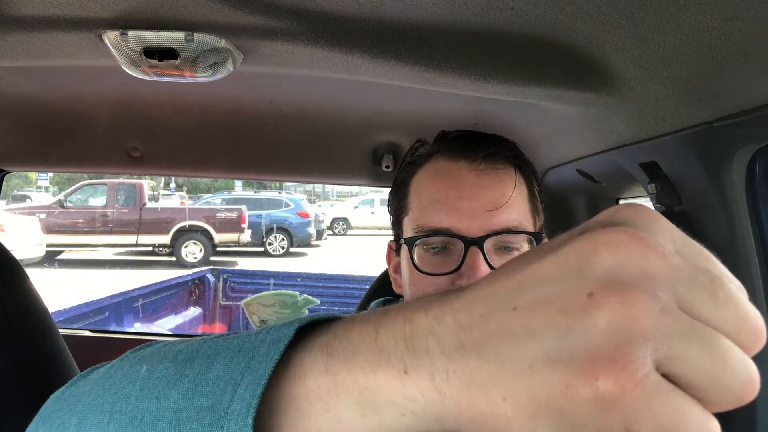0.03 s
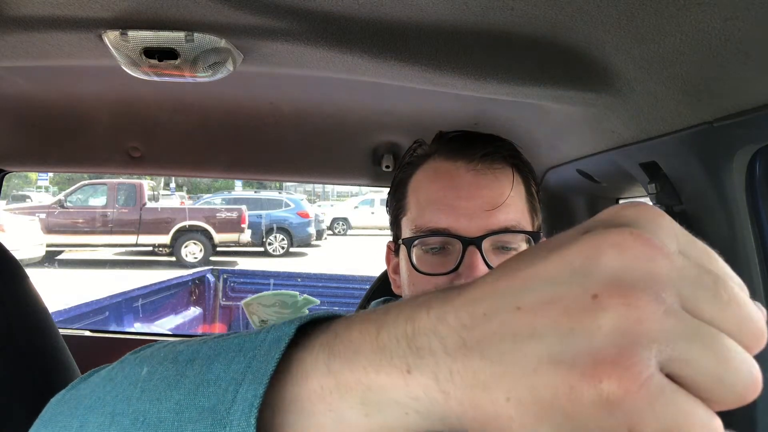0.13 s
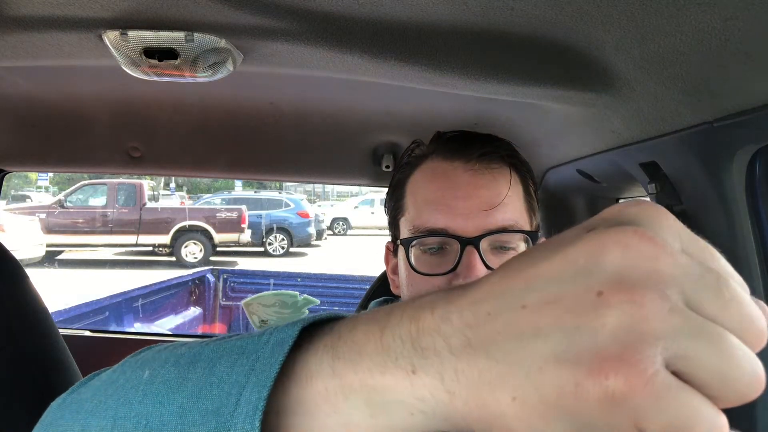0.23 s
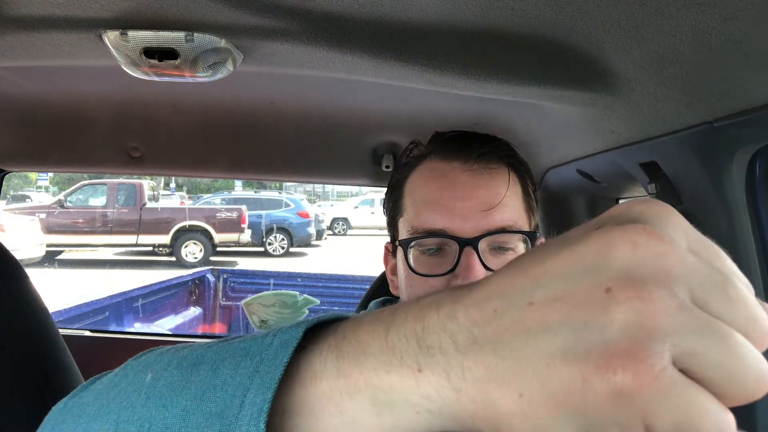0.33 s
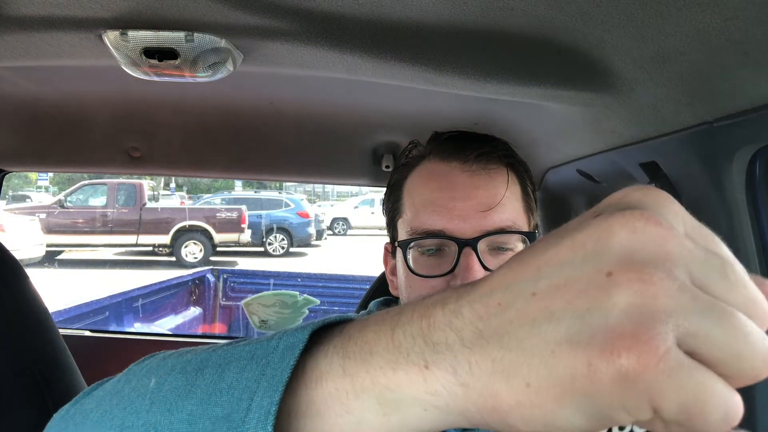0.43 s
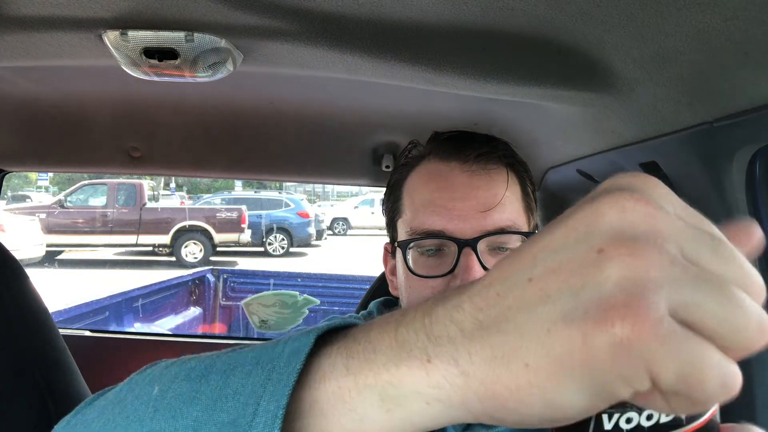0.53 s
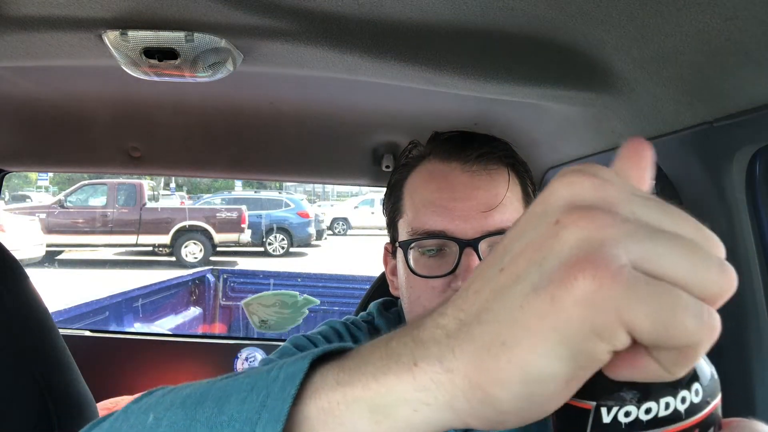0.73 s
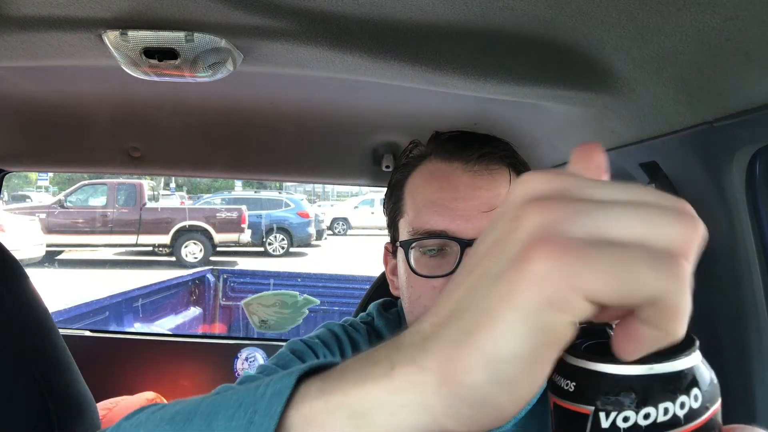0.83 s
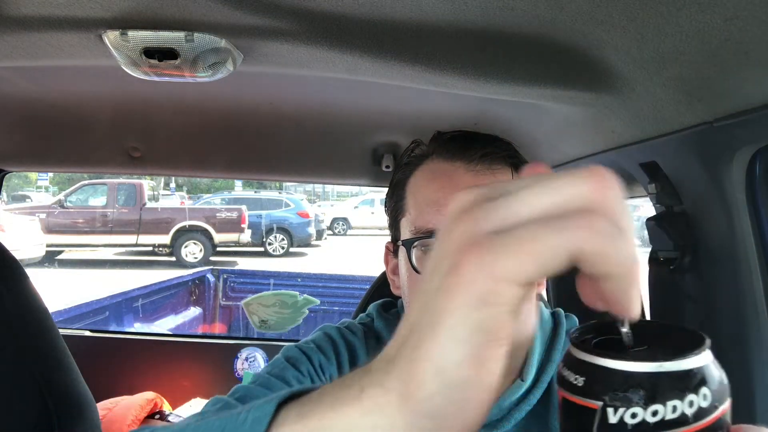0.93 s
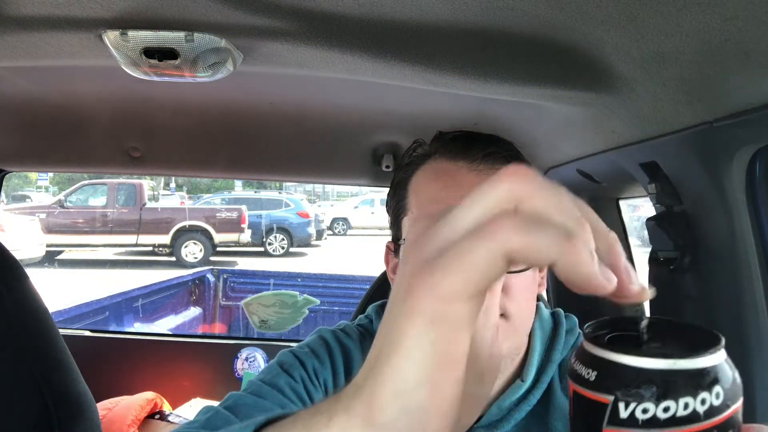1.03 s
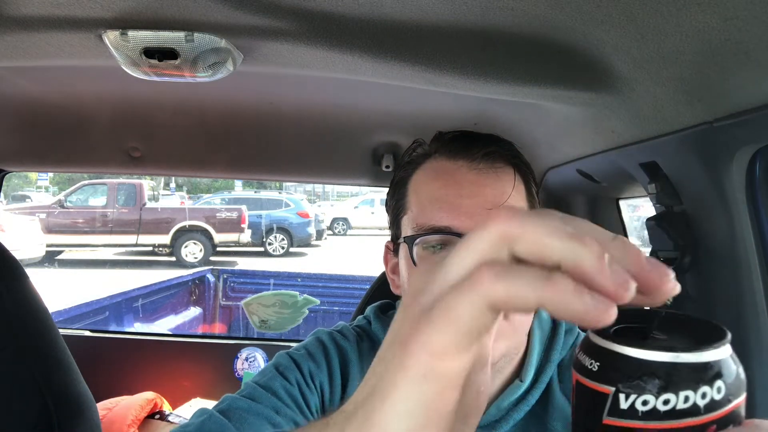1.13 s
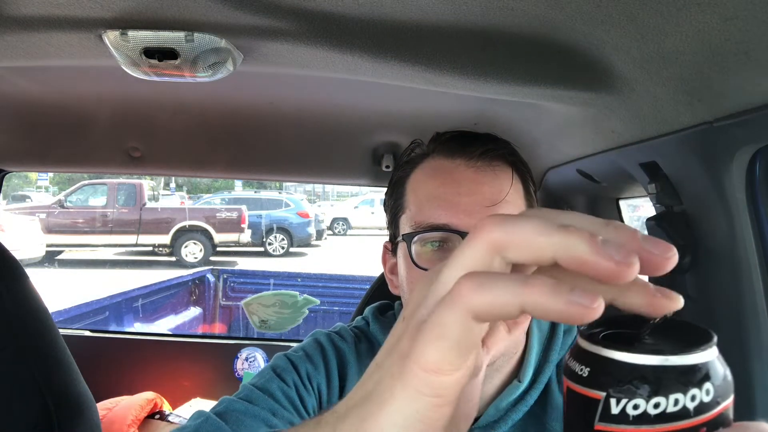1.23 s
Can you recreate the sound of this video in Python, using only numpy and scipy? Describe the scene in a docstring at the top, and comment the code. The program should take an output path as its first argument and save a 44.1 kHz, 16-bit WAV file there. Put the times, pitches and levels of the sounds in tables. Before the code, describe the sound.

An aluminium can snaps open with sharp metallic cracks, followed by faint tab ticks.

```python
"""An aluminium drink can is opened close up in a parked car, over a soft cabin rumble.
A finger brushes the tab; the tab creaks against the lid and cracks the seal.
The scored lid tears in a run of snaps and pops open; its flap scrapes inward and comes to rest.
Last, the finger pushes the tab back with faint rubs and ticks that ring the air in the can."""
import sys
import numpy as np
from scipy.fft import rfft, irfft
from scipy.io import wavfile
from scipy.ndimage import uniform_filter1d, map_coordinates

SR = 44100
rng = np.random.default_rng(int(sys.argv[2]) if len(sys.argv) > 2 else 0)


def store_pcm(level_fs):
    """Save levels as 16-bit WAV."""
    pcm = np.round(np.clip(level_fs, -1, 1) * 32767).astype(np.int16)
    wavfile.write(sys.argv[1], SR, np.atleast_2d(pcm).T)


N = 57330

# Tone colour of the tearing lid. Each row: frequency in Hz, relative level in dB.
TORN_COLOUR = [(150, -44.5), (300, -19), (550, -14.5), (1000, -6.5), (1550, -23.5), (1850, -6), (2250, -3),
               (2600, -5), (3300, 3), (4400, -1), (5200, -1.5), (6100, 7), (7000, -3), (8600, -3.5),
               (10000, -6.5), (13000, -8), (16000, -17)]


def amp(db):
    """Decibels to gain."""
    return 10 ** (np.asarray(db) / 20)


def unit(x):
    """Scale to rms 1."""
    return x / np.sqrt(np.mean(x ** 2) + 1e-20)


def fader(points):
    """Gain per sample through (s, dB) points, silent outside them."""
    return amp(np.interp(np.arange(N) / SR, *np.transpose(points), left=-np.inf, right=-np.inf))


def eq_curve(points, treble_db=0, shelf_hz=9575):
    """Unit-power gain curve through (Hz, dB) points, with a treble shelf."""
    hz = np.fft.rfftfreq(2 * N, 1 / SR) + 1
    point_hz, point_db = np.transpose(points)
    shelf_db = treble_db / (1 + (shelf_hz / hz) ** 10)
    return unit(amp(np.interp(np.log(hz), np.log(point_hz), point_db) + shelf_db))


def equalise(x, gain):
    """Minimum-phase filter with the given gain per frequency."""
    cepstrum = irfft(np.log(gain + 1e-9))
    cepstrum[1:N] *= 2
    cepstrum[N + 1:] = 0
    return irfft(rfft(x, 2 * N) * np.exp(rfft(cepstrum)))[:N]


def resonate(x, peaks):
    """Play x through (Hz, width Hz, dB) resonances."""
    hz = np.fft.rfftfreq(2 * N, 1 / SR)
    response = sum(amp(db) * 1j * hz * width / (centre ** 2 - hz ** 2 + 1j * hz * width)
                   for centre, width, db in peaks)
    return irfft(rfft(x, 2 * N) * response)[:N]


def ring(start, modes, attack):
    """Damped (Hz, dB, t60 s) modes set ringing at one moment."""
    t = np.arange(SR // 5) / SR
    tone = sum(amp(db - 60 * t / t60) * np.sin(2 * np.pi * (hz * t + rng.random()))
               for hz, db, t60 in modes)
    return np.pad((1 - np.exp(-t / attack)) * tone, (round(start * SR), N))[:N]


def snap(start, colour, treble_db, attack, crack_t60, tail_t60, tail_db):
    """A crack in thin metal: crowded modes that die fast, and a weaker tail from can and cabin."""
    t = np.maximum(np.arange(N) / SR - start, 0)
    decay = np.hypot(amp(-60 * t / crack_t60), amp(tail_db - 60 * t / tail_t60))
    burst = (1 - np.exp(-t / attack)) * decay * rng.choice([-1, 1], N)
    # Dividing out the burst's own broad colour excites the modes evenly.
    burst_colour = np.sqrt(uniform_filter1d(np.abs(rfft(burst, 2 * N)) ** 2, size=1600))
    return equalise(burst, eq_curve(colour, treble_db) / unit(burst_colour))


def cabin():
    """A bed of low rumble from outside the car, with faint hiss."""
    # Cabin tone. Each row: frequency in Hz, relative level in dB.
    rumble_colour = [(22, -37.5), (35, -10.5), (52, 2), (80, -3.5), (150, -0.5), (230, -9.5), (310, -7.5),
                     (500, -16.5), (800, -24), (1250, -25), (2000, -32.5), (4000, -35), (8000, -38),
                     (15500, -44.5)]
    return amp(-58) * unit(equalise(rng.standard_normal(N), eq_curve(rumble_colour)))


def finger(grain_db=4, grains_per_s=330):
    """Skin sticks and slides over the tab in short, faint strokes."""
    # Strokes. Each row: centre in seconds, width in seconds, level in dB, high cut in Hz.
    strokes = [(.008, 0.011, -61.5, 12300), (.55, 0.017, -65.5, 11800), (0.642, 0.014, -62.5, 3710),
               (.72, 0.045, -77.5, 3800), (.93, 0.059, -73.5, 6006)]
    # Skin on metal. Each row: frequency in Hz, relative level in dB.
    skin_colour = [(300, -12), (1200, -0.5), (1550, -3), (2300, -2.5), (2900, -8.5), (3600, -5),
                   (5000, -6.5), (7000, -6.5), (15000, -14)]
    t, hz = np.arange(N) / SR, np.fft.rfftfreq(2 * N, 1 / SR)
    grain = map_coordinates(rng.standard_normal(N), [t * grains_per_s])
    friction = unit(amp(grain_db * grain) * rng.standard_normal(N))
    rubs = np.zeros(N)
    for centre, width, db, cut_hz in strokes:
        swell = amp(db) * np.exp(-.5 * ((t - centre) / width) ** 2)
        rubs += swell * equalise(friction, unit(eq_curve(skin_colour) / (1 + (hz / cut_hz) ** 6)))
    return rubs


def tab():
    """The tab folds back; each tick rings the tab and the air under the opening."""
    # Light ticks. Each row: start in seconds, level in dB, treble in dB, attack in seconds,
    # then the air ring's pitch in Hz, level in dB and t60 in seconds.
    tick_cues = [(.5195, -60, 1, 0.00087, 793, -55.5, 0.085), (.545, -58, -2, 0.0025, 780, -58.5, .08),
                 (0.6586, -41, 1, 0.00015, 930, -44.5, 0.13), (.668, -46, 5, 0.00056, 910, -61, 0.047),
                 (.857, -64.5, 23, 0.00096, 1230, -81, .05), (1.048, -50.5, 5, 0.00047, 1150, -49, 0.04),
                 (1.0639, -46.5, 11, 0.00078, 1210, -39, 0.048),
                 (1.0693, -45, -4.5, 0.00066, 1145, -38.5, 0.06)]
    # Colour of a tick. Each row: frequency in Hz, relative level in dB.
    tick_colour = [(200, -15), (700, -27.5), (1200, -7), (1550, -9), (1900, 0.5), (2350, -3.5), (2800, -5),
                   (3400, 9), (4300, -5), (5000, -6.5), (6200, -7), (7600, -12), (9700, -14),
                   (12000, -21.5), (16000, -19)]
    # The tab's modes. Each row: frequency in Hz, relative level in dB, t60 in seconds.
    tab_modes = [(1820, -14, .06), (2300, -15, .05), (2800, -15, .045), (3335, -11, .045), (3800, -14, .04),
                 (4265, -15, .045), (6050, -15, .035), (9650, -23, .03)]
    # Faint hollow tone of the air under the opening. Each row: time in seconds, level in dB.
    air_fade = [(.74, -95.5), (.835, -66.5), (.87, -77.5), (.95, -73.5), (1.04, -85), (1.25, -91)]
    ticks = np.zeros(N)
    for start, db, treble_db, attack, air_hz, air_db, air_t60 in tick_cues:
        click = snap(start, tick_colour, treble_db, attack, crack_t60=.02, tail_t60=.069, tail_db=-9)
        ticks += amp(db) * (click + ring(start, tab_modes, attack))
        ticks += ring(start, [(air_hz, air_db, air_t60)], attack=.0014)
    hollow_air = unit(resonate(rng.standard_normal(N), [(1217, 68, 0)]))
    return ticks + fader(air_fade) * hollow_air


def flap(slips_per_s=1300, grit=.78, hiss_db=-7):
    """Tiny slips ring the flap, first as it bends, then as its edge rasps on the rim."""
    # The bend along the score and the rasp on the rim. Each row: time in seconds, level in dB.
    bend_fade = [(.364, -60.5), (.371, -25.5), (.379, -34), (.386, -25), (.391, -25), (.396, -38),
                 (.407, -44), (.422, -51), (.44, -51), (.465, -76)]
    rasp_fade = [(.392, -58.5), (.401, -37.5), (.408, -42.5), (.414, -38.5), (.422, -48.5), (.43, -46),
                 (.436, -52), (.462, -63)]
    # Resonances of flap and edge. Each row: centre in Hz, width in Hz, relative level in dB.
    flap_peaks = [(2352, 321.6, -7), (3210, 330, -1), (3918, 109, 10.5), (4400, 250, -0.5),
                  (5950, 500, -10.5), (7400, 550, -6), (8536, 240, 0.5), (12900, 310, -6.5)]
    edge_peaks = [(2178, 160, 0), (2380, 200, 0)]
    slips = unit((rng.random(N) < slips_per_s / SR) * rng.standard_normal(N))
    friction = unit(grit * slips + .5 * rng.standard_normal(N))
    hiss = amp(hiss_db) * unit(equalise(friction, eq_curve(TORN_COLOUR)))
    bend = unit(resonate(friction, flap_peaks)) + hiss
    rasp = unit(resonate(friction, edge_peaks))
    return fader(bend_fade) * bend + fader(rasp_fade) * rasp


def prying(vent_s=.31, attack=.00015, lid_t60=.05):
    """The tab levers against the lid, which snaps and rings, duller once the pressure is gone."""
    # Snaps under the tab. Each row: start in seconds, level in dB, treble in dB.
    snap_cues = [(0.223, -50.5, 3), (0.2292, -44.5, -9.5), (0.2342, -42, -12.5), (0.2422, -19.5, -2.5),
                 (0.2461, -6, 3), (.2471, -8, -0.5), (0.2792, -42, -0.5), (.2925, -45.5, -8),
                 (0.3271, -39, 6.5), (.331, -42.5, 8.5), (.3450, -25.5, -4), (0.35, -28, -11),
                 (0.3581, -16.5, 3.5), (0.3595, -15, 7.5), (0.3646, -13, 1)]
    # The lid's colour before and after it vents, and the modes it rings with at every snap. Each row: frequency
    # in Hz, relative level in dB.
    sealed_colour = [(150, -45.5), (420, -16.5), (750, -28), (1000, -17.5), (1620, -17.5), (1760, 2),
                     (2050, 0.5), (2600, -6), (3700, -8), (4800, -5.5), (5400, 4.5), (6300, -2), (7000, -7),
                     (8200, -11.5), (10400, -7), (12000, -12.5), (13300, -6.5), (15000, -17),
                     (16500, -21.5)]
    vented_colour = [(100, -35.5), (650, -14), (1000, -21.5), (1600, -27), (1780, -8), (2050, 4.5),
                     (2600, -10), (3800, -10), (4500, -5.5), (5500, 3.5), (6400, -3.5), (7700, -8.5),
                     (8700, -7.5), (9500, -24), (11000, -21.5), (14000, -19.5), (16000, -24)]
    lid_modes = [(1762, -22), (1987, -17), (2140, -23), (2295, -22), (5190, -19), (5617, -19), (6060, -20),
                 (6830, -25)]
    modes = [(hz, db, lid_t60) for hz, db in lid_modes]
    snaps = np.zeros(N)
    for start, db, treble_db in snap_cues:
        colour = sealed_colour if start < vent_s else vented_colour
        crack = snap(start, colour, treble_db, attack, crack_t60=.011, tail_t60=.056, tail_db=-14.5)
        snaps += amp(db) * (crack + ring(start, modes, attack))
    return snaps


def tearing(flap_t60=.048):
    """The can pops open, the score rips, and the freed flap rings and comes to rest."""
    # Rips of the lid, then knocks as the flap stops.
    # Each row: start in seconds, level in dB, treble in dB, attack in seconds.
    rip_cues = [(0.368, -8.5, -3, 0.00044), (0.3703, -9, 1.5, 0.0001), (0.383, -21.5, 0, .0006),
                (0.4, -29.5, 2.5, .0003), (0.411, -31, 4, .0004)]
    stop_cues = [(0.4269, -29.5, -14, 0.0014), (0.4311, -25.5, 0, 0.00055)]
    # The flap's modes and the colour of its stop. Each row: frequency in Hz, relative level in dB.
    flap_modes = [(2150, -23), (3250, -20), (3815, -22), (3960, -21), (4356, -23), (4480, -20), (4755, -22),
                  (6400, -22), (8680, -20)]
    stop_colour = [(100, -48), (700, -8), (1550, -33), (1780, 1), (2400, -5), (2800, -9), (4000, -20),
                   (4750, 1.5), (5300, -11), (6350, 3.5), (6900, -6), (7700, 3), (8300, -14), (10800, -5),
                   (14000, -12), (15300, -8), (16500, -17)]
    # The pop as the lid gives way. Each row: frequency in Hz, level in dB, t60 in seconds.
    pop_modes = [(503.5, -33.5, .08), (601, -26, .065), (747, -26, .04), (913.5, -32, 0.01)]
    modes = [(hz, db, flap_t60) for hz, db in flap_modes]
    metal = np.zeros(N)
    for start, db, treble_db, attack in rip_cues:
        rip = snap(start, TORN_COLOUR, treble_db, attack, crack_t60=.014, tail_t60=.055, tail_db=-16.5)
        metal += amp(db) * (rip + ring(start, modes, attack))
    for start, db, treble_db, attack in stop_cues:
        knock = snap(start, stop_colour, treble_db, attack, crack_t60=.015, tail_t60=.05, tail_db=-8)
        metal += amp(db) * knock
    return metal + ring(start=.366, modes=pop_modes, attack=.002)


def scene():
    """The can over the quiet cabin, in mono."""
    return (prying() + tearing() + flap() + tab() + finger() + cabin())[None]


def record(dry):
    """A steep high cut takes off the very top of the mix."""
    hz, cut_hz = np.fft.rfftfreq(2 * N, 1 / SR), 15900
    return irfft(rfft(dry, 2 * N) / np.sqrt(1 + (hz / cut_hz) ** 200))[:, :N]


dry = scene()
out = record(dry)
store_pcm(out)
```